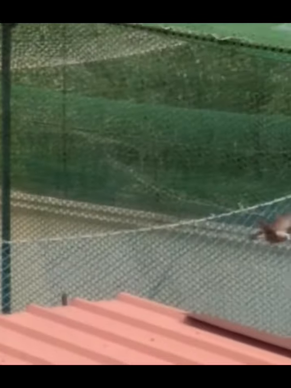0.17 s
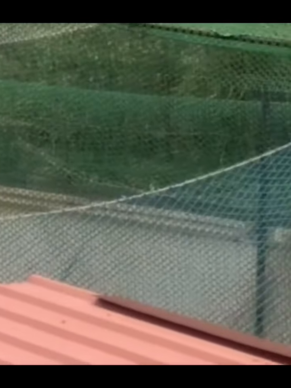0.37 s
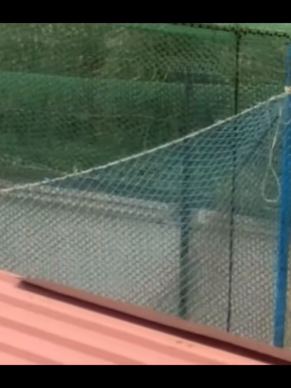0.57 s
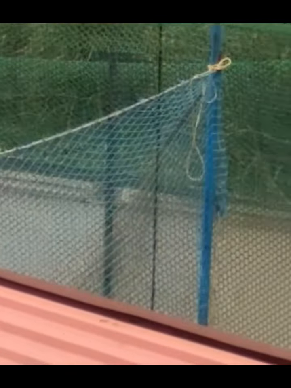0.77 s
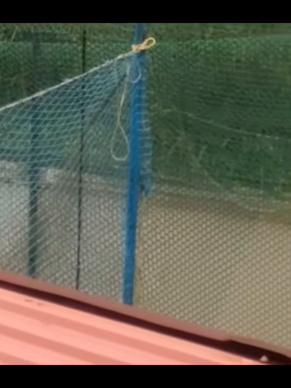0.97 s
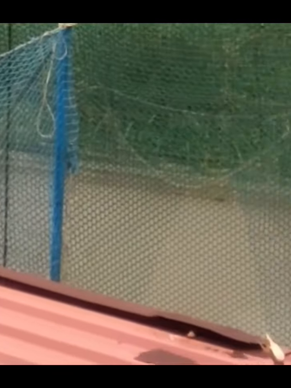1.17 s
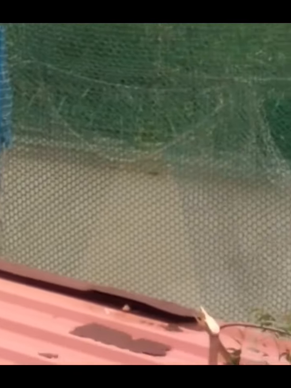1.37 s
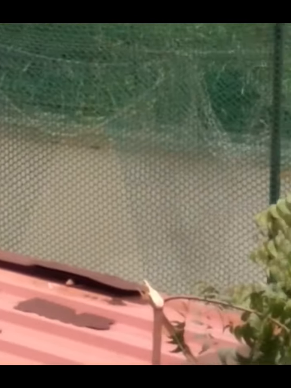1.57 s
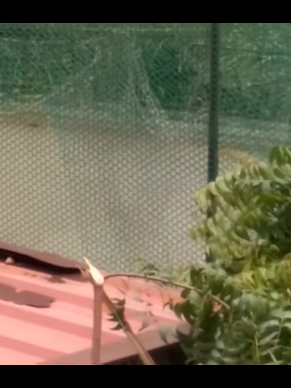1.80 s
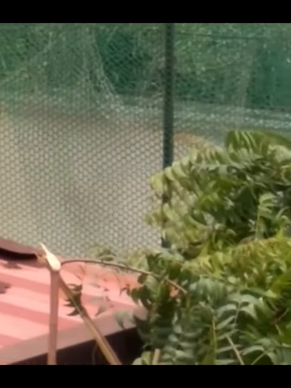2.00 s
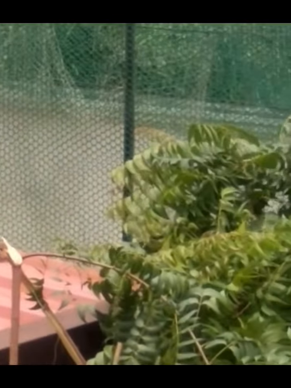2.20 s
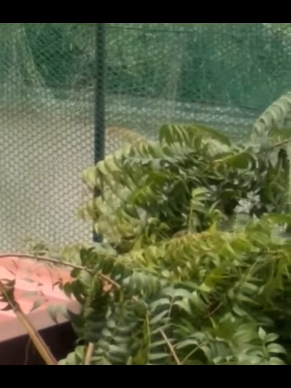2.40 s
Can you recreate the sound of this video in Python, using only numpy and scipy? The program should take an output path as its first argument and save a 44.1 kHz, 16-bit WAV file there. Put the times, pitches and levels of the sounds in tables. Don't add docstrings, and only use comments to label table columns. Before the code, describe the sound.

Rapid bird babbling fills a walled yard, faint calls first, then loud overlapping chirps, two smoother whistles and a long downward slide; one dull handling knock midway, with soft traffic rumble, hum and hiss underneath.

```python
import sys
import numpy as np
from scipy import signal
from scipy.fft import rfft, irfft, next_fast_len
from scipy.io import wavfile
from scipy.ndimage import uniform_filter1d, map_coordinates

SR = 44100
rng = np.random.default_rng(int(sys.argv[2]) if len(sys.argv) > 2 else 0)


def attenuation_scalar(level_db):
    decades = np.asarray(level_db, float) / 20
    return 10 ** decades


def pcm_store(signal):
    levels = np.round(np.clip(np.atleast_2d(signal), -1, 1) * 32767)
    wavfile.write(sys.argv[1], SR, levels.astype(np.int16).T)


N = 108045
SPAN = SR // 4
T = np.arange(SPAN) / SR
FALL_CURVE = 2.537
TREMBLE_RATE, BREATH_RATE, FLUTTER_RATE = 120, 700, 90
JITTER_HZ = 8

HIGH_DB = [4.5, -4.5, -8]


def unit(x):
    return x / np.sqrt(np.mean(x ** 2) + 1e-20)


def along(points, hz):
    f, v = np.transpose(points)
    return np.interp(np.log(hz + 1), np.log(f + 1), v)


def wobble(rate, size):
    return map_coordinates(rng.standard_normal(2000), [np.arange(size) * rate / SR])


def filtered(x, response):
    m = next_fast_len(N + 8192)
    return irfft(rfft(x, m) * response(np.fft.rfftfreq(m, 1 / SR)), m)[..., :N]


def turns(hz, jitter_hz, rate):
    return 2 * np.pi * np.cumsum(hz + jitter_hz * wobble(rate, SPAN)) / SR


def fall(hz, fall_hz, length, curve=FALL_CURVE):
    return hz + fall_hz * np.clip(1 - T / length, 0, 1) ** curve


def release_db(length):
    return -20 * np.clip(T - length, 0, 1) / 0.0025


def swell(length, rise):
    swell_db = -5 * np.clip(1 - T / (rise * length), 0, 1)
    flutter_db = 3.2 * wobble(FLUTTER_RATE, SPAN)
    return np.clip(T / 0.0042, 0, 1) * attenuation_scalar(swell_db + release_db(length) + flutter_db)


def overtones(phase, dbs, order, breath=.2):
    total = 0
    for n, db in enumerate(dbs, order):
        level = attenuation_scalar(db + 0.81 * wobble(FLUTTER_RATE, SPAN))
        roughness = 1 + breath * n ** .9 * wobble(BREATH_RATE, SPAN)
        total = total + level * roughness * np.sin(n * phase)
    return total


def mixing(start_s, high):
    # start_s, low_pitch_hz
    mixed = [(.228, 2820), (.395, 2960), (.94, 2900), (1.135, 3020), (1.59, 3080), (1.84, 3060),
             (2.105, 3090)]
    mixed_db = [-3.5, -14.5, -24, -12, -9.5, -3, -33]
    # times_high, times_low, level_db
    products = [(0, 1, -15), (1, 1, -8), (2, 1, 0), (3, 1, -9), (2, -1, -16), (3, -1, -16), (4, -1, -26)]
    total = 0
    for (at, low_hz), call_db in zip(mixed, mixed_db):
        if abs(at - start_s) < .008:
            low = turns(low_hz, 20, TREMBLE_RATE)
            for a, b, db in products:
                unsteady = attenuation_scalar(5.6 * wobble(BREATH_RATE / 2, SPAN))
                total = total + attenuation_scalar(call_db + db) * np.sin(round(a) * high + round(b) * low) * unsteady
    return total


def high_voice(table, overtone_db, curve=FALL_CURVE):
    for s, length, hz, fall_hz, db in table:
        high = turns(fall(hz, fall_hz, length, curve), JITTER_HZ, TREMBLE_RATE)
        x = overtones(high, overtone_db, order=1) + mixing(s, high)
        yield s, attenuation_scalar(db) * swell(length, .5) * x


def far_calls():
    # start_s, length_s, final_pitch_hz, fall_hz, level_db
    far = [(0, 0.072, 3790, 19, -31.5), (0.026, 0.12, 4120, 400, -29.5), (0.155, 0.075, 3820, 290, -26),
           (0.442, 0.1, 3820, 45, -40), (1.795, 0.024, 3700, 230, -35), (1.94, 0.044, 3700, 220, -30),
           (2.103, 0.0505, 4397, 155, -19.5), (2.097, 0.071, 3786, 340, -28.5),
           (2.295, 0.061, 3810, 260, -37)]
    far_db = [-4, -12, -27]
    return high_voice(far, far_db)


def ports(pair, response):
    # pitch_hz, likeness (0 to 1)
    alike = [(60, 0.92), (150, 1), (380, 0.69), (800, 0.38), (1500, 0.29), (3000, 0.023)]
    # pitch_hz, lead_radians
    lag = [(60, 0.058), (380, 0.76), (800, 1.1), (1500, 3.12), (3000, 1.3)]

    def blend(hz):
        angle = np.arccos(np.clip(along(alike, hz), 0, 1)) / 2
        return response(hz) * [np.cos(angle), np.sin(angle)]

    def lead(hz):
        return np.exp(.5j * along(lag, hz) * np.array([[1], [-1]]))

    mid, side = filtered(pair, blend)
    return unit(filtered(np.array([mid + side, mid - side]), lead)) * attenuation_scalar([[.9], [-.9]])


def town():
    # pitch_hz, density_db
    rumble = [(12, -40), (28, -37), (45, 2.5), (70, -27), (105, -7.5), (300, -7.5), (800, -11.5),
              (1200, -15), (1600, -96)]
    # pitch_hz, density_db
    hiss = [(710, -99), (1200, -4), (3430, -9.5), (3870, -5), (4750, -10.5), (5770, -9), (11700, -12),
            (15000, -11.5), (16000, -48)]

    def rush(points):
        return ports(rng.standard_normal((2, N)), lambda hz: attenuation_scalar(along(points, hz)))

    rumble_level = attenuation_scalar(-37.2 + 1.4 * wobble(4.64, N))
    hiss_level = attenuation_scalar(-37 + 0.13 * wobble(4.0, N))
    return rumble_level * rush(rumble) + hiss_level * rush(hiss)


def machine():
    # pitch_hz, width_hz, level_db
    hum = [(44.7, 20, -51), (91, 18, -56), (370.7, 5.3, -42.5), (392.8, 10.3, -46.5), (602.7, 3.3, -48),
           (832.6, 2.35, -42.5), (1082, 4.5, -53.5)]

    def line(centre, width):
        return ports(rng.standard_normal((2, N)), lambda hz: 1 / (1 + ((hz - centre) / width) ** 2))

    return sum(attenuation_scalar(db) * line(hz, width) for hz, width, db in hum)


def high_calls():
    # start_s, length_s, final_pitch_hz, fall_hz, level_db
    high = [(0.228, 0.041, 4052, 230, -24.5), (0.394, 0.053, 4056, 377, -21.5),
            (0.578, 0.048, 3990, 278, -26), (.632, 0.045, 3920, 73, -33.5), (0.757, 0.083, 3840, 434, -28),
            (0.828, 0.039, 4223, 98, -28.5), (.882, 0.014, 4260, -120, -26.5),
            (.94, 0.069, 3964, 198, -24.5), (0.97, 0.05, 4098, 200, -26), (1.035, 0.055, 4170, -110, -40),
            (1.108, 0.087, 3864, 185, -32), (1.133, 0.072, 4169, 149.5, -20.5),
            (1.222, 0.031, 4146, 15, -30), (1.59, 0.0665, 4125, 171, -20.5), (1.67, 0.071, 3900, 33, -24),
            (1.837, .048, 4155, 169, -26), (1.9, 0.031, 4115, 24, -26), (2.208, 0.013, 4410, 23, -46)]
    return high_voice(high, HIGH_DB)


def low_calls():
    # start_s, length_s, pitch_hz, octave_level_db, fundamental_over_octave_db
    low_table = [(0.392, 0.046, 2996, -27.5, -33), (0.497, 0.034, 3000, -30, -29),
                 (0.713, 0.066, 3060, -28.5, -22), (0.798, 0.084, 3000, -38, -15),
                 (0.947, 0.047, 2957, -28.5, -21), (1.112, 0.031, 3064, -24, -21),
                 (1.57, 0.026, 2955, -22, -19.5), (1.568, 0.11, 3115, -48.5, 9),
                 (1.807, 0.035, 2910, -23.5, -28), (1.89, 0.012, 3090, -34, 5.5),
                 (1.903, 0.047, 2790, -31, -1.5), (1.965, 0.071, 2832, -39, 2.5),
                 (2.127, 0.033, 2970, -33, -4), (2.432, 0.023, 2910, -36.5, -5.5)]
    low_db = [3, -18.5, -3, -25]
    for s, length, hz, db, first_db in low_table:
        low = turns(fall(hz, 35.9, length), 17.7, TREMBLE_RATE)
        yield s, attenuation_scalar(db) * swell(length, 0.14) * overtones(low, [first_db, *low_db], order=1)


def rasps():
    # start_s, top_pitch_hz, level_db
    rasp_table = [(.42, 3060, -45), (0.511, 3000, -61), (0.754, 3075, -42), (1.329, 3080, -38.5),
                  (1.534, 3123, -41), (1.65, 3100, -39.5), (1.891, 3150, -35.5), (1.98, 2830, -45),
                  (2.138, 3047, -41)]
    length_s = 0.038
    for s, hz, db in rasp_table:
        low = turns(hz * (1 - 0.15 * np.clip(T / length_s, 0, 1)), 120, BREATH_RATE)
        yield s, attenuation_scalar(db) * swell(length_s, 0.067) * overtones(low, [-2.5, 7, -39, -1.5], order=1)


def hoarse_calls():
    # start_s, length_s, final_pitch_hz, fall_hz, level_db
    hoarse = [
        (0.573, 0.036, 4560, 60.5, -25),
        (0.643, 0.036, 4507, 122, -26.5),
        (0.702, 0.025, 4380, 29.5, -32.5),
    ]
    for s, length, hz, fall_hz, db in hoarse:
        high = turns(fall(hz, fall_hz, length), 80, BREATH_RATE)
        yield s, attenuation_scalar(db) * swell(length, 0.42) * overtones(high, [0, -5, -13], order=1, breath=0.53)


def flares():
    # start_s, length_s, pitch_hz, level_db
    flare_table = [
        (.853, 0.012, 4220, -14),
        (.992, 0.014, 4040, -20),
        (1.645, 0.019, 4100, -18),
        (1.866, 0.019, 4170, -18),
    ]
    for s, length, hz, db in flare_table:
        high = turns(hz, JITTER_HZ, TREMBLE_RATE)
        yield s, attenuation_scalar(db) * swell(length, 0.69) * overtones(high, [0, -16, -18], order=1)


def bump():
    t = np.arange(N) / SR - 1.1257
    rebound_s = 0.0105

    def push(u):
        ring = np.sin(2 * np.pi * 225 * u + 1.2) + attenuation_scalar(-7) * np.sin(2 * np.pi * 700 * u)
        return np.clip(u / 0.00042, 0, 1) * attenuation_scalar(-60 * np.abs(u) / .018) * ring

    return attenuation_scalar(-16.5) * (push(t) - attenuation_scalar(-3) * push(t - rebound_s)) * attenuation_scalar([[1.2], [-1.2]])


def whistles():
    # start_s, length_s, final_pitch_hz, fall_hz, level_db
    notes_heard = [
        (1.284, 0.049, 3044, 67, -23.5),
        (1.469, 0.068, 3120, -67, -22.5),
    ]
    whistle_db = [-2.5, -16.5, -20.5, -22]
    for s, length, hz, fall_hz, db in notes_heard:
        phase = turns(fall(hz, fall_hz, length), 12, TREMBLE_RATE)
        level = attenuation_scalar(release_db(length) + 0.49 * wobble(FLUTTER_RATE, SPAN))
        shape = np.clip(T / 0.0084, 0, 1) * level
        yield s, attenuation_scalar(db) * shape * (np.sin(phase) + overtones(phase, whistle_db, order=2))


def slides():
    # start_s, length_s, final_pitch_hz, fall_hz, level_db
    slide_table = [
        (1.339, 0.097, 3963, 350, -19.5),
    ]
    return high_voice(slide_table, HIGH_DB, curve=1.1)


def yard(left_db, wet_db):
    t = np.arange(SR // 3) / SR
    tail = rng.standard_normal((2, len(t))) * attenuation_scalar(-60 * t / 0.55) * np.clip(t / 0.0035, 0, 1)
    answer = attenuation_scalar(-6.5) * tail / np.linalg.norm(tail[0])
    when, size = rng.random((2, 6)), rng.standard_normal((2, 6))
    early = (40 + when * .03 * SR).astype(int)
    answer[[[0], [1]], early] += attenuation_scalar(-2.5) * size / 6 ** .5
    wall = (.021 * SR * (1 + .1 * rng.random(2))).astype(int)
    answer[[0, 1], wall] += attenuation_scalar(-11.5)
    answer *= attenuation_scalar(wet_db)
    answer[[0, 1], [3, 0]] += 1
    return answer * attenuation_scalar([[left_db / 2], [-left_db / 2]])


def flock():
    # start_s, left_over_right_db
    swing = [(0.0, 4), (0.42, 1.5), (1.57, 0), (1.58, 4.5), (1.66, -2.5), (1.92, 2.5), (2.11, -2),
             (2.14, 3.0), (2.45, 5)]
    calls = [*far_calls(), *high_calls(), *low_calls(), *rasps(), *hoarse_calls(), *slides()]
    close = [*flares(), *whistles()]
    out = np.zeros((2, N + SR))
    for group, wet_db in ((calls, 0), (close, -6)):
        for s, x in group:
            left_db = np.interp(s, *np.transpose(swing))
            heard = signal.fftconvolve(x[None], yard(left_db, wet_db), axes=1)
            out[:, max(round(s * SR), 0):][:, :heard.shape[1]] += heard
    return out[:, :N]


def starved(x):
    # pitch_hz, level_under_treble_db
    gate = [(2000, -80), (3300, -40.5), (5000, -43.5), (8000, -43), (12000, -47.5), (13500, -33),
            (16000, -41.5)]
    frame, bins = 2048, 14
    hz, _, z = signal.stft(x, SR, nperseg=frame)
    power = np.mean(np.abs(z) ** 2, 0)
    edges = np.arange(0, len(hz), bins)
    scatter_db = 1.8 * uniform_filter1d(rng.standard_normal((len(edges), power.shape[1])), 2, 1)
    band = np.add.reduceat(power, edges, 0) / bins * attenuation_scalar(2 * scatter_db)
    band = np.repeat(band, bins, 0)[:len(hz)]
    treble = uniform_filter1d(power[hz > 2500].sum(0), 3, origin=1)
    over_db = 10 * np.log10(band / treble + 1e-20) - along(gate, hz)[:, None]
    kept = z / (1 + attenuation_scalar(-np.clip(30 * over_db, -100, 100)))
    return signal.istft(kept, SR, nperseg=frame)[1][:, :N]


def scene():
    return flock() + town() + machine() + bump()


def band_limit(x):
    return signal.sosfilt(signal.butter(12, 16120, fs=SR, output="sos"), x)


def record(dry):
    heard = filtered(dry, lambda hz: hz < 15900)
    mix = starved(heard)
    return band_limit(mix)


dry = scene()
out = record(dry)
pcm_store(out)
```